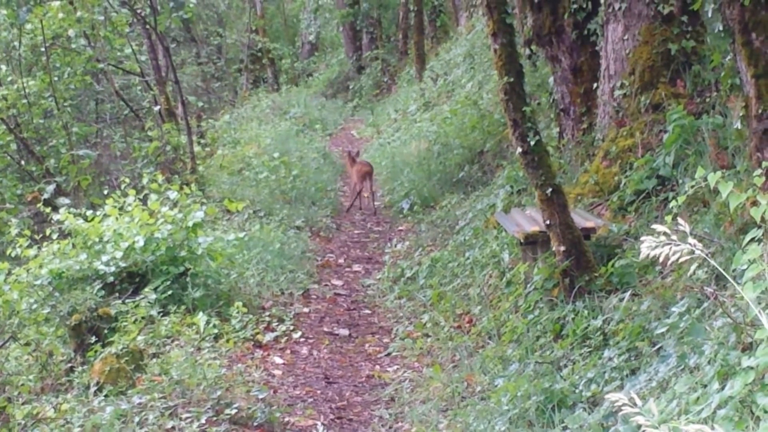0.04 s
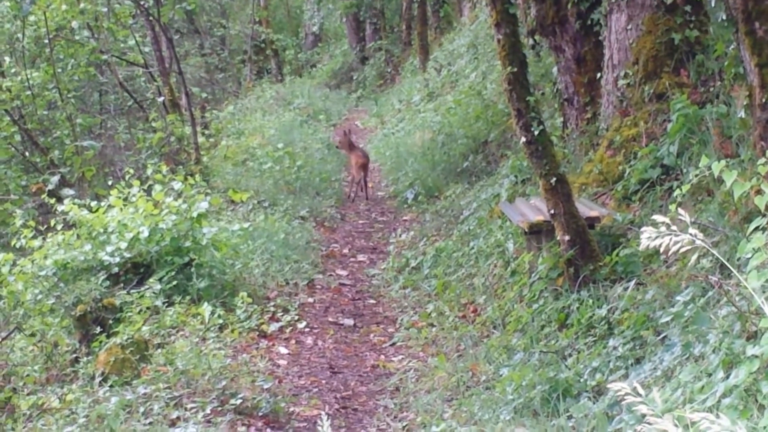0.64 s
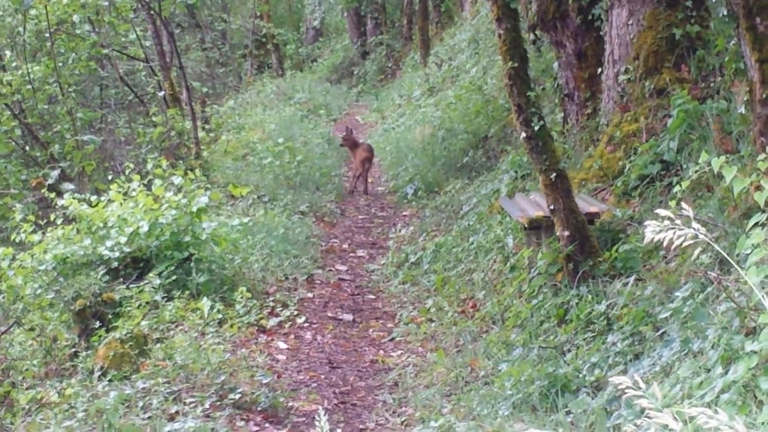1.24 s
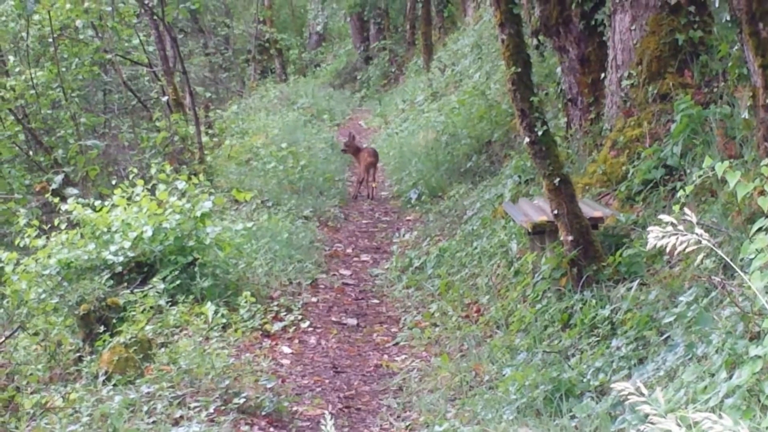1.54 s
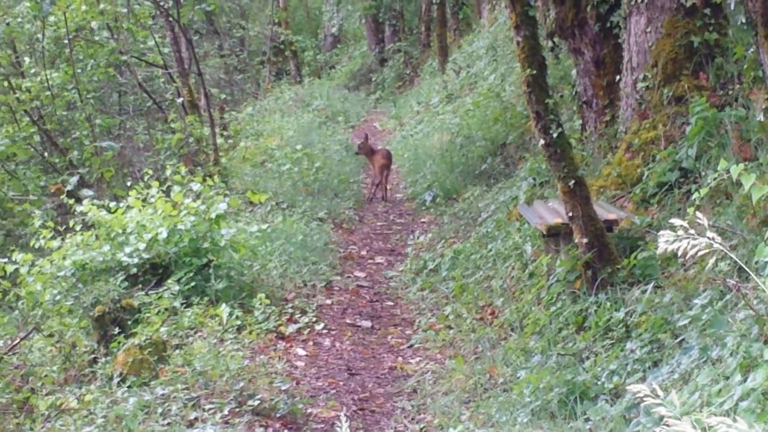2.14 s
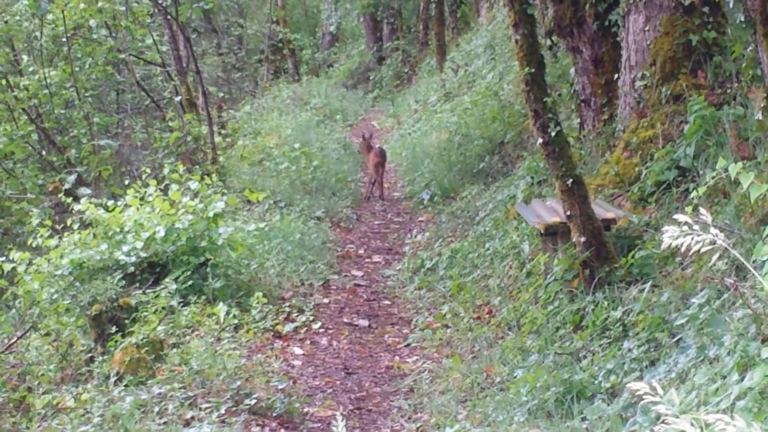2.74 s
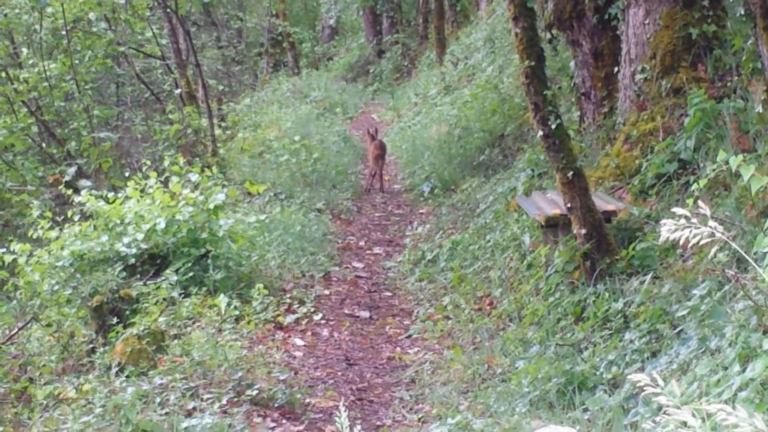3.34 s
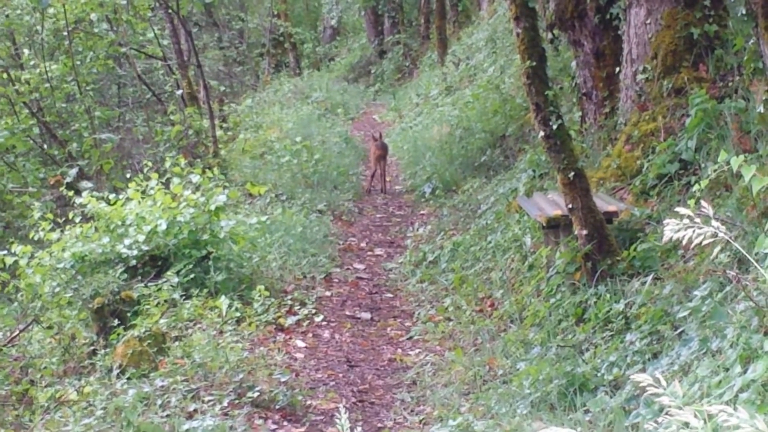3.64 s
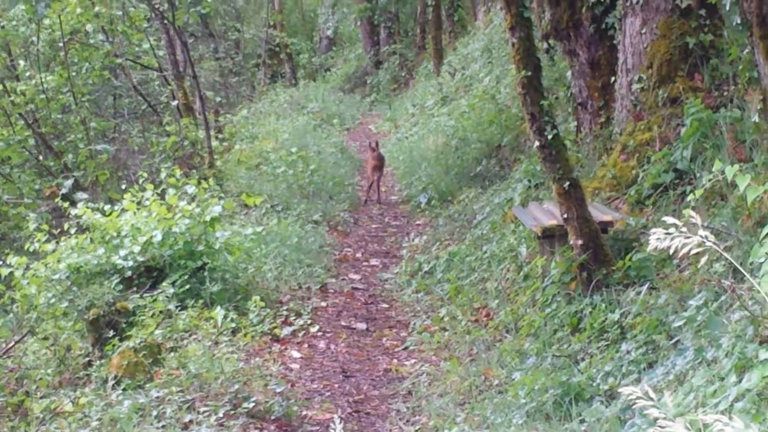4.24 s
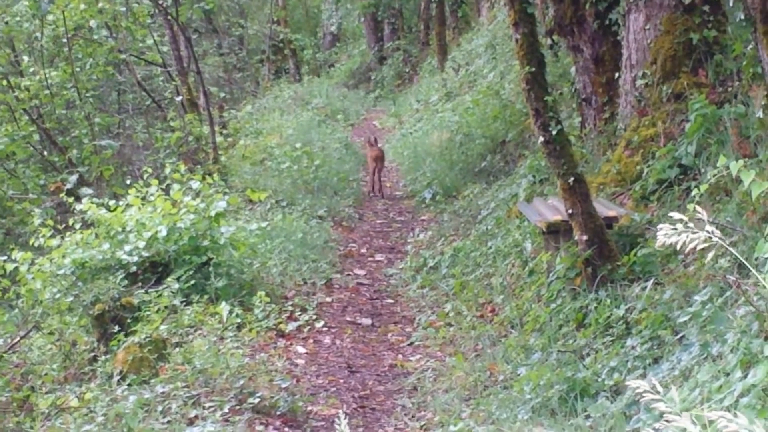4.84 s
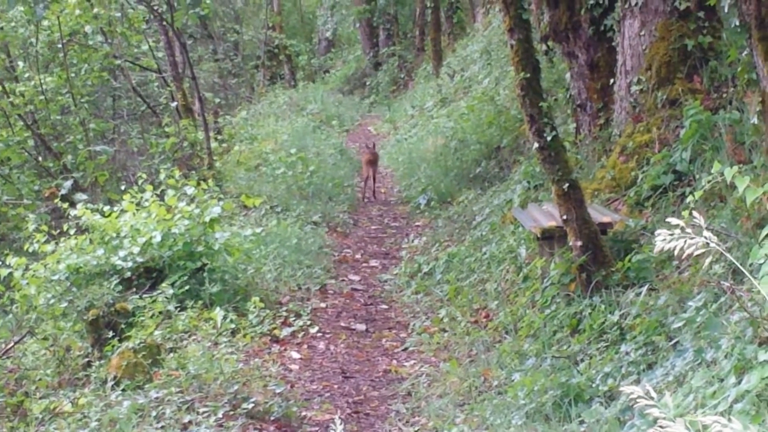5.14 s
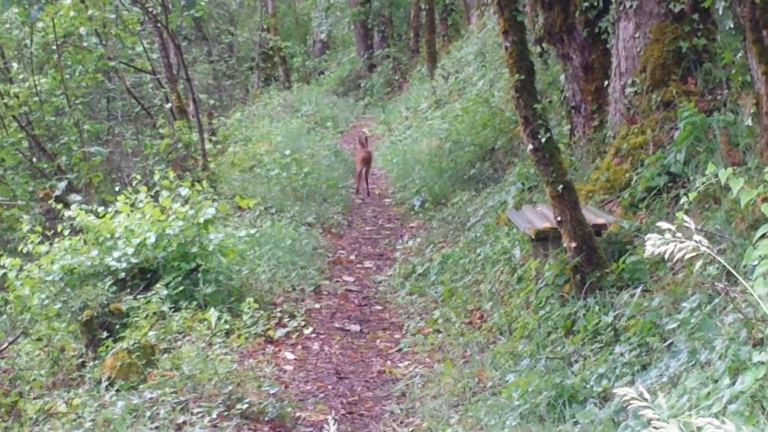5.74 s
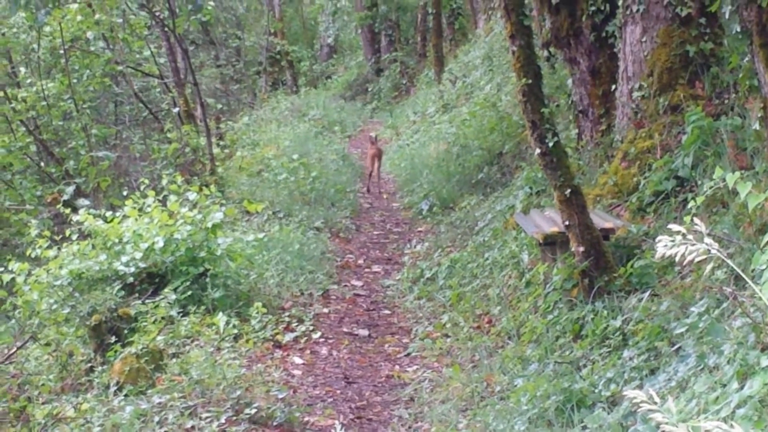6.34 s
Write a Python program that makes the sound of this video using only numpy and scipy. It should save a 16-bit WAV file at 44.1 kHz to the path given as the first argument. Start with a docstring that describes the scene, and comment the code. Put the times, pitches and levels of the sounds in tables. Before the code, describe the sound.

In quiet woodland, a young deer squeaks four times, one and a half to two seconds apart, its nearly pure, slightly raspy cries standing out and ringing off the trunks. Birds are heard throughout: bright chirps at the start, high warbling trills, faint ticking to the left and mellower whistles near the end. Air gently buffets the microphone early on, then leaves only a soft outdoor hush.

```python
"""A fawn calling in the woods

A fawn gives four thin cries that rise, sag and echo among the trunks. Small birds trill very
high, a songbird whistles, and others call or tick farther off. Each voice is built from pure
tones that slide in pitch. Under them lie a soft hush, a few knocks and twig ticks, and, at
first, low puffs of air on the microphone, all shaped from noise."""
import sys
import numpy as np
from scipy import signal
from scipy.fft import rfft, irfft, next_fast_len
from scipy.io import wavfile
from scipy.ndimage import uniform_filter1d, map_coordinates

SR = 44100
rng = np.random.default_rng(int(sys.argv[2]) if len(sys.argv) > 2 else 0)


def put_to_file(sound):
    """Save the sound as 16-bit audio at rate SR, in the file named by the first command-line argument."""
    columns = np.atleast_2d(sound).T  # one column per channel
    safe = np.clip(columns, -1, 1)
    whole_steps = np.round(safe * 32767)
    wavfile.write(sys.argv[1], SR, whole_steps.astype(np.int16))


N = 290178

# The fawn's pitch, one list per cry: t/s, f/Hz
CRY_PITCH = [
    [(1.458, 1856), (1.47, 1854), (1.495, 1889), (1.53, 1905), (1.58, 1871), (1.62, 1832), (1.645, 1771),
     (1.672, 1728)],
    [(3.598, 1724), (3.613, 1762), (3.63, 1828), (3.65, 1830), (3.677, 1786), (3.725, 1772), (3.765, 1740),
     (3.795, 1670)],
    [(5.058, 1680), (5.072, 1603), (5.088, 1734), (5.115, 1790), (5.155, 1802), (5.22, 1785), (5.258, 1753),
     (5.285, 1666), (5.312, 1400)],
    [(6.502, 1592), (6.516, 1597), (6.54, 1774), (6.56, 1815), (6.6, 1850)],
]
# Her first four harmonics (tones at 1, 2, 3, 4 times the pitch), one list per cry: t/s, 4 x level/dB
CRY_LEVELS = [
    [(1.465, -40.5, -21, -31, -44), (1.487, -26, -23.5, -34.5, -39.5), (1.551, -26.5, -21, -29.5, -34),
     (1.571, -23, -24, -30, -42.5), (1.619, -23.5, -23.5, -27.5, -42.5), (1.66, -42, -43, -40, -48)],
    [(3.61, -46, -27.5, -33.5, -45.5), (3.674, -25.5, -26.5, -31, -40.5), (3.7, -23.5, -25, -27.5, -49),
     (3.73, -26, -35.5, -40.5, -38.5), (3.772, -32, -35, -31, -45.5), (3.785, -34.5, -47, -40, -43)],
    [(5.061, -37, -41, -24, -46), (5.072, -28.5, -40, -29, -39), (5.088, -24, -27.5, -29, -33),
     (5.126, -24, -26, -25.5, -43.5), (5.156, -19, -27.5, -31, -34.5), (5.234, -24.5, -29, -24.5, -36.5),
     (5.292, -40, -46, -43.5, -56), (5.3, -46.5, -68, -44, -73)],
    [(6.515, -32, -48, -28, -52), (6.527, -25.5, -38, -36, -34.5), (6.545, -23, -24.5, -27.5, -38.5),
     (6.575, -22.5, -28, -33, -37)],
]
# Where those four sit as she turns her head, one row per cry: 4 x pan/dB (above 0 is to the left)
CRY_PANS = [(3, 9.5, 6.5, 4.5), (7.5, 3, 15, 4), (5.5, 1, 15, 7), (6, 3, 14, 2)]
# How she calls, one row per cry: long echo/dB, overtone boost/dB, closing hiss/dB
CRY_MANNER = [(-12, 6.5, -43), (-18, 3, -42.5), (-19.5, 0.5, -52), (-34, 0, -65)]
# How far each of the four waves runs ahead at the left ear: lead/radians
HARMONIC_LEADS = [-0.78, 1.2, -1.8, -1.4]
# Her faint higher tones: harmonic number, level/dB against the fourth (before the boost)
OVERTONES = [(5, -22), (6, -29.5), (7, -41), (8, -40)]


def fawn(waver=0.0015, rasp=0.00083, fray=0.0055, shimmer_db=0.47, echo_pan_db=6.0):
    """Nearly pure squeaks that arch, then sag as the cry runs out. The trees answer from all sides."""
    out = np.zeros((2, N))
    for pitch, levels, pans, manner in zip(CRY_PITCH, CRY_LEVELS, CRY_PANS, CRY_MANNER):
        echo_db, boost_db, hiss_db = manner
        t = np.arange(pitch[0][0], pitch[-1][0], 1 / SR)
        hz = uniform_filter1d(curves(pitch, t)[0], size=500)  # round off the corners
        hz *= 1 + waver * wobble(169, len(t)) + rasp * wobble(1400, len(t))
        swell = fade(t, rise=0.022, fall=0.0072) * amp(shimmer_db * wobble(123.6, len(t)))
        harmonic_dbs = curves(levels, t)
        direct, to_trees, edge = np.zeros((3, 2, N))
        for k, (db, pan_db, lead) in enumerate(zip(harmonic_dbs, pans, HARMONIC_LEADS), start=1):
            add(direct, t[0], swell * amp(db) * tone(k * hz, pan_db, lead))
            add(to_trees, t[0], swell * amp(db) * tone(k * hz, echo_pan_db, lead))
        # the top of the voice is slightly raspy
        for k, db in OVERTONES:
            frayed_hz = k * hz * (1 + fray * wobble(600, len(t)))
            loudness = amp(harmonic_dbs[-1] + boost_db + db) * fade(t, rise=0.017, fall=0.07)
            add(edge, t[0], loudness * tone(frayed_hz, pan_db=-4, lead=1))
        # the voice breaks off in a short hoarse hiss
        hiss = noise([(1200, -25), (1900, 7.5), (2700, -13), (3700, 3),
                      (5000, -1), (7000, -26), (9500, -43)])[:, :int(0.04 * SR)]
        add(edge, t[-1] - 0.016, amp(hiss_db) * hiss * np.hanning(hiss.shape[1]))
        out += direct + tree_echo(to_trees, near_db=-8.5, far_db=echo_db, near_fade_s=0.57)
        # leaves scatter the overtones and the hiss much more than the lower harmonics
        out += amp(-4) * edge + tree_echo(edge, near_db=-2, far_db=echo_db, near_fade_s=0.22)
    return out


# High warbled calls: t/s, length/s, centre f/Hz, first dip after/s, level/dB, pan/dB, extra arch/Hz
TRILLS = [(0.904, 0.27, 7090, 0.061, -44, -2, 229), (2.07, 0.19, 7100, .045, -54.5, 1.5, 83),
          (2.566, 0.12, 6800, 0.033, -59.5, 1, 98), (2.66, 0.275, 7070, 0.053, -46.5, -1.5, 176),
          (3.005, 0.19, 6730, 0.029, -58.5, 6, 100), (3.3, 0.24, 6740, 0.039, -58, -2, 242),
          (4.067, 0.19, 6844, 0.056, -49.5, -2.5, 130), (4.321, 0.23, 7025, 0.057, -58, 2, -62),
          (4.761, 0.23, 6680, 0.031, -54, -2, 302), (4.867, 0.27, 7105, 0.059, -47.5, -1, 266),
          (6.245, 0.28, 7040, 0.06, -47, -1.5, 232)]


def trilling_birds(depth_hz=600, opening_arch_s=0.056, warbles_per_s=31, drift_cycles=0.042):
    """One slow arch in pitch, then a fast warble with round tops and sharp dips, blurred by leaves."""
    out = np.zeros((2, N))
    for start, length, centre_hz, first_dip_s, db, pan_db, extra_hz in TRILLS:
        t = np.arange(int(length * SR)) / SR
        opening = t < first_dip_s
        rate = np.where(opening, 1 / opening_arch_s, warbles_per_s)
        cycles = (t - first_dip_s) * rate + drift_cycles * wobble(12.9, len(t))
        arches = np.abs(np.sin(np.pi * cycles))
        hz = centre_hz + depth_hz * (arches - 2 / np.pi)  # 2 / pi is an arch's average height
        hz += extra_hz * opening * arches + 55 * wobble(701, len(t))
        loudness = amp(db + 2.9 * wobble(71.4, len(t))) * fade(t, rise=0.0036, fall=0.036)
        add(out, start, loudness * tone(hz, pan_db, lead=1.05))
    return amp(-3) * out + tree_echo(out, near_db=-4, far_db=-13, near_fade_s=0.16)


# Clear bird whistles, including one faint, distant repeated note:
# t/s, length/s, start f/Hz, middle f/Hz, end f/Hz, level/dB, pan/dB
CLEAR_NOTES = [(.04, 0.05, 6150, 6290, 6570, -44, -10), (.068, 0.093, 6480, 6507, 6467, -33.5, -0.5),
               (.242, 0.025, 4080, 4930, 6200, -38, 5), (.281, 0.044, 3610, 3780, 3800, -32.5, 1.5),
               (.335, 0.044, 3784, 3844, 4000, -35.5, 4), (.465, 0.012, 4530, 4700, 5600, -38, 5),
               (.497, 0.087, 3480, 3788, 3640, -38.5, 4), (.66, 0.2, 3734, 3798, 3870, -47.5, 3),
               (2.36, 0.11, 2754, 2750, 2940, -68.5, 13), (2.505, 0.15, 2680, 2652, 2700, -67, 12),
               (2.89, 0.15, 2736, 2740, 2940, -66, 12), (3.485, 0.15, 2780, 2768, 2910, -68.5, 12),
               (4.23, 0.15, 2710, 2754, 2850, -70, 6), (4.58, 0.16, 1820, 2040, 1990, -54, 2),
               (5.02, 0.075, 2490, 2387, 2180, -53, -1), (5.085, 0.2, 2282, 2215, 2264, -46, 6),
               (5.308, 0.019, 2270, 2080, 1900, -43, -2), (5.669, 0.036, 1765, 1904, 2033, -54.5, -2),
               (5.69, 0.16, 2034, 1979, 1820, -47.5, 1.5), (6.105, 0.055, 1907, 2270, 2400, -49, 3),
               (6.155, 0.17, 2400, 2224, 1675, -48.5, 4.5)]
# Far bird notes and, at 0 s near 1810 and 3550 Hz, the fading echo of an earlier fawn cry: same columns
ECHOING_NOTES = [(0, 0.066, 4580, 5140, 4590, -42.5, 7), (0, 0.11, 3550, 3550, 3510, -55, 12),
                 (0, 0.27, 1810, 1776, 1758, -53, 9), (2.55, 0.45, 5800, 5880, 5770, -61, 10),
                 (2.98, 0.082, 5860, 5660, 5770, -63, 8), (.02, 0.23, 2135, 2025, 2337, -48, 5.5),
                 (.22, 0.23, 2516, 2508, 2555, -48, 11), (.57, 0.02, 4100, 4330, 4470, -48, 1),
                 (.635, 0.023, 3880, 3485, 3074, -42, 6), (.705, 0.048, 3125, 3395, 3890, -46, 2),
                 (.77, 0.037, 3715, 4280, 4300, -41.5, 31), (.845, 0.029, 3795, 3310, 3060, -45, 4),
                 (1.03, 0.11, 2336, 2195, 2358, -49.5, 7), (1.755, 0.023, 4350, 3870, 4500, -42.5, 16),
                 (1.89, 0.018, 4250, 4600, 5000, -39.5, 27), (1.903, 0.0305, 4250, 3605, 3440, -38, 6),
                 (2.033, 0.029, 4450, 4060, 4070, -34.5, 20), (2.055, 0.031, 4230, 4380, 4580, -46.5, 12),
                 (2.155, 0.036, 4235, 3850, 3490, -43, 7), (4.12, 0.093, 2417, 2480, 2470, -60, 17),
                 (4.695, 0.084, 2016, 1810, 1800, -53.5, 5), (5.83, 0.12, 2770, 2700, 2585, -57, 5),
                 (5.92, 0.028, 2460, 2504, 2300, -50, -2)]


def whistles_and_echoes():
    """Some whistles arrive fairly clear; the echoing notes come mostly by way of the trees."""
    direct = gliding_tones(CLEAR_NOTES, waver=0.0032, lead=-0.85)
    far = gliding_tones(ECHOING_NOTES, waver=0.015, lead=0)
    blurred = amp(-9) * far + tree_echo(far, near_db=-5.5, far_db=-4.5, near_fade_s=0.3)
    clear = amp(-0.5) * direct + tree_echo(direct, near_db=-4.5, far_db=-6, near_fade_s=0.28)
    return clear + blurred


def gliding_tones(notes, waver, lead):
    """Pure tones, each gliding through three pitches."""
    out = np.zeros((2, N))
    for start, length, *pitches, db, pan_db in notes:
        t = np.arange(int(length * SR)) / SR
        glide = np.polyfit([0, 0.5, 1], pitches, 2)
        hz = np.polyval(glide, t / length) * (1 + waver * wobble(242.5, len(t)))
        loudness = amp(db) * fade(t, rise=length * 0.097, fall=length * 0.25)
        add(out, start, loudness * tone(hz, pan_db, lead))
    return out


# A distant bird's ticking phrases: t/s, level/dB
TICK_PHRASES = [(0.631, -54.5), (1.063, -60), (2.363, -64), (2.81, -57.5), (3.227, -63), (3.642, -58),
                (4.081, -59.5), (4.531, -64), (4.929, -61), (5.411, -61), (5.824, -59.5), (6.212, -59.5)]


def ticking_bird(step_s=0.042, slowing_s=0.002, top_hz=4550, droop_hz=340, fade_db=9):
    """Four short pips in a slowing row, away to the left; each hooks downward as it fades."""
    out = np.zeros((2, N))
    t = np.arange(int(0.027 * SR)) / SR
    progress = t / t[-1]
    hz = top_hz - droop_hz * (1.6 * progress - 0.6) ** 2
    loudness = amp(-fade_db * progress ** 2) * fade(t, rise=0.007, fall=0.004)
    pip = loudness * tone(hz, pan_db=13, lead=0.3)
    for start, db in TICK_PHRASES:
        for k, accent_db in enumerate([3.0, 6.1, 8.4, 7.9]):
            when = start + k * step_s + k * k * slowing_s + rng.normal(0, 0.0019)
            add(out, when, amp(db + accent_db + rng.normal(0, 1)) * pip)
    return amp(-1) * out + tree_echo(out, near_db=-10, far_db=-9, near_fade_s=0.2)


# Soft knocks and twig ticks: t/s, level/dB
KNOCKS = [(0.763, -44), (3.03, -48), (6.192, -46)]
TWIG_TICKS = [(2.265, -49.5), (4.936, -50.5)]
# The dull tone of a knock: f/Hz, level/dB
KNOCK_SPECTRUM = [(40, -26), (100, 7.5), (190, 7), (380, 0), (650, -24), (3000, -51)]


def knocks_and_twigs(knock_fade_s=0.052, twig_fade_s=0.059):
    """Dull bumps and tiny dry ticks: bursts of noise that drop 60 dB in their fade time."""
    out = np.zeros((2, N))
    t = np.arange(SR // 8) / SR
    thud = noise(KNOCK_SPECTRUM)
    crack = noise([(300, -5), (2500, 8), (5000, -23), (12000, -25)])
    for start, db in KNOCKS:
        burst = thud[:, int(start * SR):][:, :len(t)]
        add(out, start, amp(db + 1 - 60 * t / knock_fade_s) * burst)
    for start, db in TWIG_TICKS:
        burst = crack[:, int(start * SR):][:, :len(t)]
        add(out, start, amp(db - 60 * t / twig_fade_s) * burst)
    return out


# How hard the air pushes: t/s, level/dB
PUFF_LEVELS = [(0.0, -44), (0.022, -42), (0.098, -56), (0.156, -42.5), (0.178, -54), (0.354, -70),
               (0.41, -55), (0.454, -65), (0.492, -43), (0.582, -67), (0.652, -51), (0.68, -72),
               (0.728, -55.5), (0.956, -57.5), (1.002, -46.5), (1.126, -57), (1.154, -50), (1.188, -64),
               (1.234, -40), (1.33, -85), (1.396, -67), (1.424, -53), (1.646, -66.5), (1.7, -64)]
# Its deep rumble: f/Hz, level/dB
PUFF_SPECTRUM = [(20, -30), (35, -14), (55, -3.5), (85, -8.5), (150, -17.5), (260, -56), (600, -72)]


def air_puffs():
    """Air buffets the microphone, mainly on the right, then dies away."""
    t = np.arange(N) / SR
    loudness = amp(curves(PUFF_LEVELS, t)[0]) * np.interp(t, [1.5, 2.1], [1, 0])
    return loudness * noise(PUFF_SPECTRUM) * amp([[-11], [4]])


# The hush, turned up during calls and down between them, as by a noise suppressor: t/s, level/dB
HUSH_LEVELS = [(0.0, -55.5), (0.02, -60.5), (0.36, -59), (0.58, -61), (1.14, -62), (1.36, -67),
               (1.64, -61.5), (1.78, -63.5), (2.22, -63.5), (2.36, -71), (2.75, -69), (2.76, -61),
               (2.78, -67.5), (2.87, -65.5), (3.25, -73), (3.58, -70), (3.75, -62.5), (3.89, -65.5),
               (4.3, -70), (4.91, -69.5), (4.95, -67), (5.05, -66.5), (5.09, -64), (5.42, -64),
               (5.64, -70.5), (5.87, -66), (6.07, -72.5), (6.16, -70), (6.2, -66.5), (6.22, -68),
               (6.48, -65.5), (6.53, -62)]
# The tone of the hush and of the drone: f/Hz, level/dB
HUSH_SPECTRUM = [(15, -20), (30, -0.5), (70, 7.5), (130, 0), (250, -3.5), (450, -4.5), (900, -1.5),
                 (1400, -6), (2300, -2), (3200, -6), (4400, -1), (6000, -8.5), (9000, -16.5), (15000, -17)]
DRONE_SPECTRUM = [(300, -14), (365, -2.5), (390, 0), (460, -30.5)]


def background_hush(lift_db=10.5):
    """A soft hush, turned up and down at set times, over a steady hiss and a faint, far drone."""
    t = np.arange(N) / SR
    hush = amp(curves(HUSH_LEVELS, t)[0] + lift_db) * noise(HUSH_SPECTRUM) * amp([[0.8], [-0.8]])
    hiss = amp(-67.5) * rng.standard_normal((2, N))
    drone = amp(-72 + 0.61 * wobble(1.9, N)) * noise(DRONE_SPECTRUM)
    return hush + hiss + drone


# How long the wood's echo takes to drop 60 dB: f/Hz, length/s
ECHO_FADE = [(1800, 1.7), (3700, 1.08), (5500, 0.5), (8000, 1.4)]


def tree_echo(sound, near_db, far_db, near_fade_s):
    """Quick scatter from nearby trunks, then the long echo of the wood."""
    hz, times, bands = signal.stft(rng.standard_normal((2, 3 * SR // 2)), SR, nperseg=256)
    bands *= amp(-60 * times / at_frequency(ECHO_FADE, hz)[:, None])
    far = signal.istft(bands, SR, nperseg=256)[1]
    t = np.arange(far.shape[1]) / SR
    near = rng.standard_normal(far.shape) * amp(-60 * t / near_fade_s)
    build_up = 1 - np.exp(-t / 0.0093)
    echo = amp(near_db) * unit(near * build_up) + amp(far_db) * unit(far * build_up)
    return signal.fftconvolve(sound, echo / np.sqrt(len(t)), axes=1)[:, :N]


# How alike noise is at the two ears: f/Hz, likeness (0 unrelated, 1 the same)
EAR_LIKENESS = [(40, 0.47), (300, 0.61), (1000, 0), (3000, 0), (10000, 0)]


def noise(spectrum):
    """Stereo noise shaped by (f/Hz, level/dB) points, more alike at both ears in the bass."""
    def gains(hz):
        angle = np.arccos(at_frequency(EAR_LIKENESS, hz)) / 2
        return amp(at_frequency(spectrum, hz)) * [np.cos(angle), np.sin(angle)]
    shared, opposed = filtered(rng.standard_normal((2, N)), gains)
    return unit(np.array([shared + opposed, shared - opposed]))


def tone(hz, pan_db, lead):
    """A pure tone on a pitch curve; the left ear gets it pan_db louder and lead radians ahead."""
    ears = np.array([[0.5], [-0.5]])
    phase = 2 * np.pi * np.cumsum(hz) / SR
    return unit(amp(pan_db * ears) * np.sin(phase + lead * ears))


def fade(t, rise, fall):
    """Fade in over rise seconds and out over fall seconds."""
    fade_in = np.sin(np.pi / 2 * np.clip((t - t[0]) / rise, 0, 1))
    fade_out = np.sin(np.pi / 2 * np.clip((t[-1] - t) / fall, 0, 1))
    return fade_in * fade_out


def wobble(rate, size):
    """A smooth curve through rate random values a second."""
    values = rng.standard_normal(int(size * rate / SR) + 4)
    return map_coordinates(values, [np.arange(size) * rate / SR])


def amp(db):
    """Turn decibels into a multiplier."""
    return 10 ** (np.asarray(db) / 20)


def unit(sound):
    """Scale to an average (rms) strength of 1."""
    return sound / np.sqrt(np.mean(sound ** 2) + 1e-20)


def at_frequency(points, hz):
    """Read between (f/Hz, value) points, with octaves evenly spaced."""
    freqs, values = np.transpose(points)
    return np.interp(np.log(hz + 1), np.log(freqs), values)


def curves(rows, t):
    """Read each column after the first (t/s) at the times t."""
    times, *columns = np.transpose(rows)
    return [np.interp(t, times, column) for column in columns]


def filtered(sound, gains):
    """Turn each frequency up or down by gains(hz)."""
    size = next_fast_len(sound.shape[-1] + 8192)
    hz = np.fft.rfftfreq(size, 1 / SR)
    return irfft(rfft(sound, size) * gains(hz), size)[..., :sound.shape[-1]]


def add(track, start_s, sound):
    """Mix a sound into a stereo track."""
    first = max(0, round(start_s * SR))
    part = track[:, first:first + sound.shape[-1]]
    part += sound[..., :part.shape[1]]


def scene():
    """Everything heard from the woodland path."""
    animals = fawn() + trilling_birds() + whistles_and_echoes() + ticking_bird()
    return animals + knocks_and_twigs() + background_hush() + air_puffs()


def record(dry):
    """Cut away the very highest treble."""
    return filtered(dry, lambda hz: hz < 15550)


dry = scene()
out = record(dry)
put_to_file(out)
```